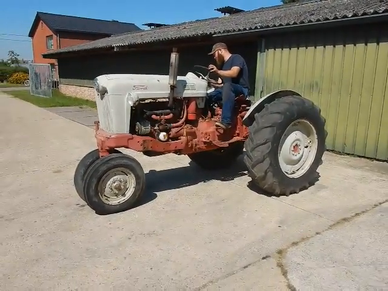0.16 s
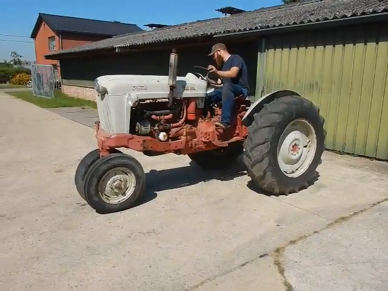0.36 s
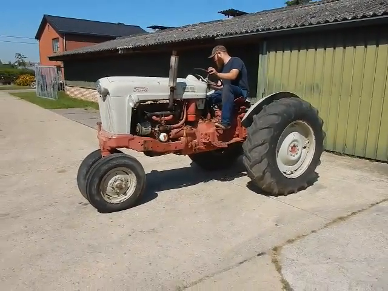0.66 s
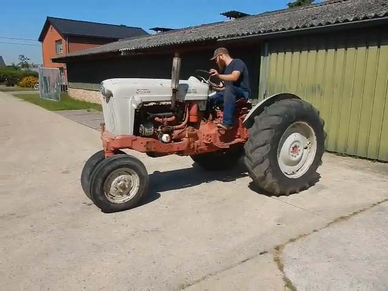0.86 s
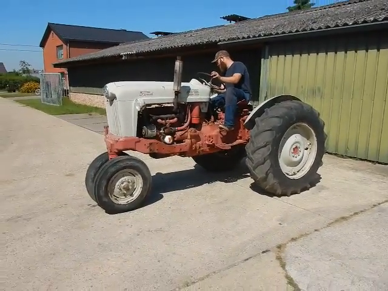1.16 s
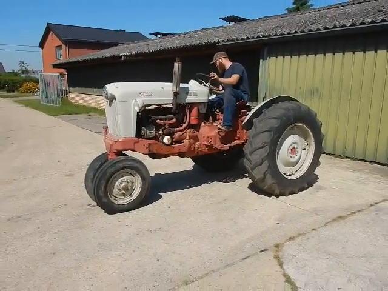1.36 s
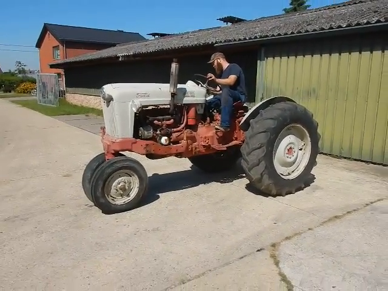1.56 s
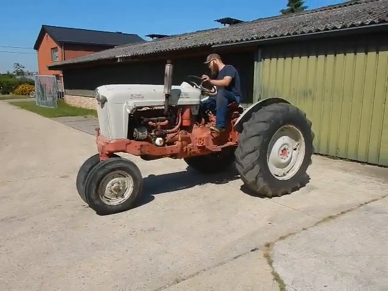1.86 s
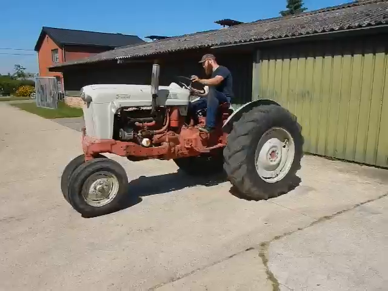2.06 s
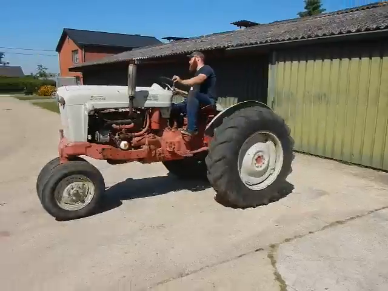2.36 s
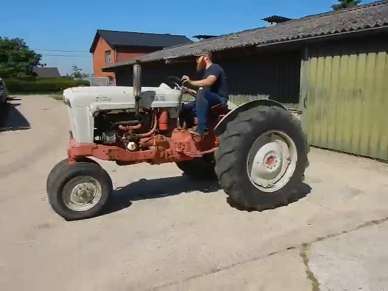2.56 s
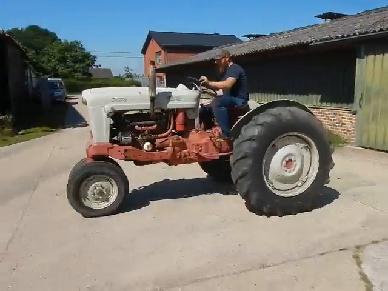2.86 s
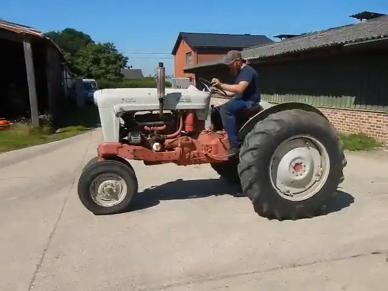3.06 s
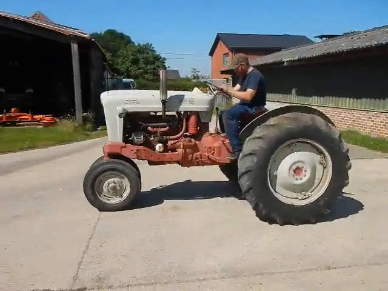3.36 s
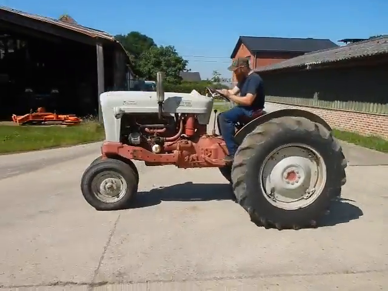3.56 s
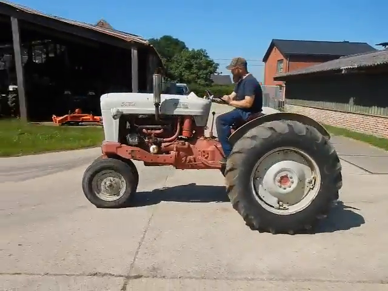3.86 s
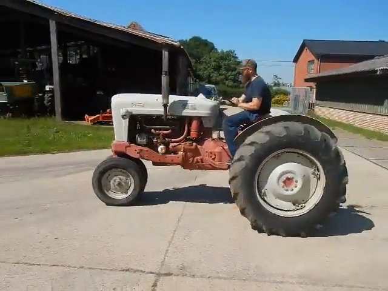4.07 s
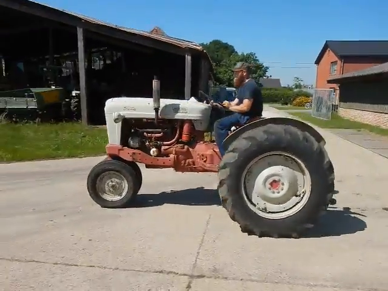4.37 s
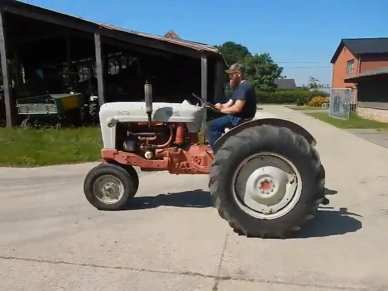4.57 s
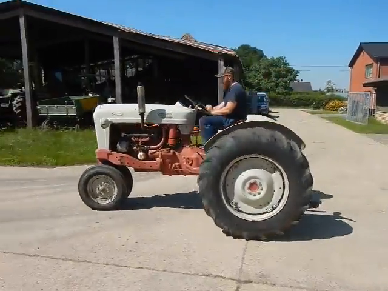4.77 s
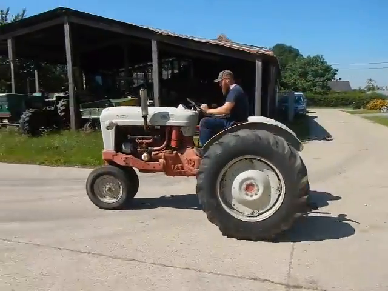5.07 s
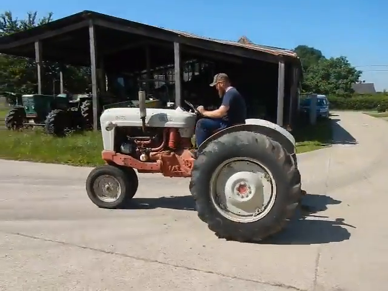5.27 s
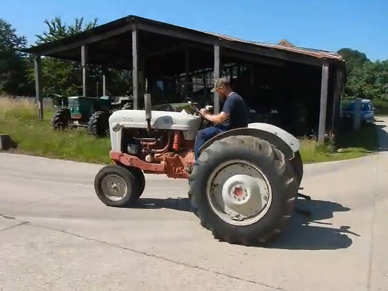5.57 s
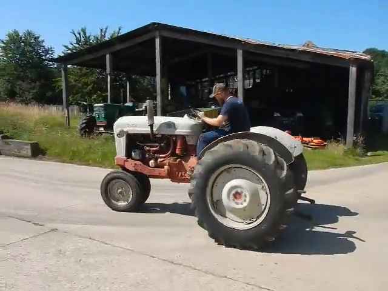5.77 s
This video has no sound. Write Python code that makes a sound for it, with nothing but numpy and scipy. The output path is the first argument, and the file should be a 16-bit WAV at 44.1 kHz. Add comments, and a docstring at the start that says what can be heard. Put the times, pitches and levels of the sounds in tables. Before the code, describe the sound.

Uneven, clattering throb of a vintage diesel tractor close by outdoors; the exhaust sinks twice amid rapid metal knocks, then revs up with a lumpy growl.

```python
"""On an open concrete yard an old four-cylinder diesel tractor drives past, a few metres from a microphone pair.
Tuned lines, a drone and surging noise make the uneven, throbbing exhaust; shaped noise clatters in the block.
Twice the exhaust dies away and the engine knocks hard, in bursts of metal contact that leave the block ringing.
Then it pulls again, the second time faster and with a lumpy growl; near the end the level dips briefly.
A gear whines faintly, a panel buzzes once and the barn walls scatter a little of the metal sound."""
import sys
import numpy as np
from scipy import signal
from scipy.fft import rfft, irfft
from scipy.io import wavfile

SR = 44100
rng = np.random.default_rng(int(sys.argv[2]) if len(sys.argv) > 2 else 0)


def put_to_file(sound):
    """Save the sound as 16-bit audio at rate SR, in the file named by the first command-line argument."""
    columns = np.atleast_2d(sound).T  # one column per channel
    safe = np.clip(columns, -1, 1)
    whole_steps = np.round(safe * 32767)
    wavfile.write(sys.argv[1], SR, whole_steps.astype(np.int16))


N = 260631
TIME = np.arange(N) / SR
SLOW_RATE, FAST_RATE = 46, 57  # slow and fast running, firings per second
LUGGING_DB = 1  # loss of the exhaust's low thump and drone for each firing per second below slow running
UNSTEADY = 0.08  # share by which the exhaust lines and the block's hum waver in level
THROB_DEPTH = 0.3  # depth of the throb at slow running; half of it at fast running


def amp(db):
    """Decibels to gain."""
    return 10 ** (np.asarray(db) / 20)


def unit(x):
    """Scales to rms 1."""
    return x / np.sqrt(np.mean(x ** 2) + 1e-20)


def curve(rows):
    """A time table, at every sample."""
    return np.interp(TIME, *np.transpose(rows))


def read(points, hz):
    """A spectrum table on a log-frequency axis."""
    f, value = np.transpose(points)
    return np.interp(np.log(hz + 1), np.log(f), value)


def colour(x, points):
    """Filters by the shape of a spectrum table, keeping the power of white noise."""
    gain = unit(amp(read(points, np.fft.rfftfreq(N, 1 / SR))))
    return irfft(rfft(x) * gain, N)


def wander(hz):
    """Slow chance of rms 1, up to about hz."""
    f = np.fft.rfftfreq(N, 1 / SR)
    return unit(irfft(rfft(rng.standard_normal(N)) * np.exp(-(f / hz) ** 2), N))


def bursts(firings, places, levels_db, rise, fall, spread_db):
    """Envelope of one burst per cylinder and cycle, no two equally strong; rise and fall in firings."""
    out = np.zeros(N)
    for place, db in zip(places, levels_db):
        cycle, age = np.divmod(firings - place + len(places), len(places))
        sizes = amp(db + spread_db * rng.standard_normal(200))
        out += sizes[cycle.astype(int)] * (1 - np.exp(-age / rise)) * np.exp(-age / fall)
    return unit(out)


def turbulence(firings, repeating):
    """Noise of which a share comes back alike in every engine cycle, which gives it the engine's pitch."""
    pattern = rng.standard_normal(3840)
    cycle_share = firings / len(CYLINDERS) % 1
    alike = pattern[(cycle_share * len(pattern)).astype(int)]
    return np.sqrt(repeating) * alike + np.sqrt(1 - repeating) * rng.standard_normal(N)


# Engine speed. Each row: time in seconds, firings per second.
SPEED = [(0.0, 45.86), (0.46, 46.17), (1.04, 45.54), (1.75, 45.23), (1.91, 43.83), (2.11, 35.02),
         (2.21, 35.17), (2.38, 46.09), (2.47, 47.82), (3.64, 45.06), (4.03, 46.15), (4.2, 45.42),
         (4.31, 47.55), (4.4, 52.42), (4.71, 56.97), (4.97, 57.45), (5.43, 56.6), (5.91, 58.34)]


def firing_rate():
    """The crankshaft's pace, in firings per second."""
    return curve(SPEED)


def lugging_db():
    """Level lost while the engine is dragged below slow running."""
    return LUGGING_DB * np.maximum(SLOW_RATE - firing_rate(), 0)


# Balance of the tractor's front and rear sound. Each row: time in seconds, share (0 front, 1 rear).
VIEW = [(0, 0.051), (2.5, 0.4), (3.5, 0.42), (4.3, 0.8), (5.1, 0.51), (5.9, 0.73)]


def rear_view():
    """How much of the rear sound is heard, rising and falling: 0 front, 1 rear."""
    return curve(VIEW)


# The engine comes off load, the first time in two steps. Each row: start, falling, staying low and
# recovering, all in seconds, then drop of the exhaust note, of the roar and of the clatter, all in dB.
DIPS = [(2.06, 0.078, 0.38, 0.93, 5.5, 8.5, 5), (2.3, 0.044, 0.13, 0.83, 5, 6.5, 9),
        (4.21, 0.15, 0.12, 0.65, 6, 7.5, 7), (5.61, 0.056, 0.053, 0.19, 3, 3, 2.5)]


def dip_db(column, lag_s=0):
    """Level change in the dips: each falls, stays low and recovers. Column 0 exhaust note, 1 roar, 2 clatter."""
    lost_db = 0
    for start, fall, stay, recover, *drops in DIPS:
        corners = start + np.cumsum([0, fall, stay, recover])
        lost_db = lost_db + drops[column] * np.interp(TIME - lag_s, corners, [0, 1, 1, 0])
    return -lost_db


def drone_turns(firings, fast):
    """Cycles of the drone, which runs a little above twice the firing rate."""
    return np.cumsum((2.285 - .028 * fast) * np.gradient(firings))


def throb(firings, fast):
    """Gain that swells as drone and hum fall into step, 10 to 15 times a second; mostly at slow running."""
    beat = drone_turns(firings, fast) - (2 * firings - .45)
    return unit(1 + THROB_DEPTH * (1 - fast / 2) * np.cos(2 * np.pi * beat))


# The four cylinders, heard in the exhaust, the roar and the clatter. Each row: exhaust opening in firings into
# the cycle, relative puff in dB, combustion in firings, relative clatter in dB from the front and from behind.
CYLINDERS = [(0.604, 0, 0.058, 5.5, -3), (1.18, 2.5, 0.85, -4, -5.5), (2.418, 1, 1.7, -7.5, -3),
             (3.7, -1.5, 2.98, 3.5, 2)]
# Exhaust lines before the overall trim. Each row: multiple of the firing rate, level in dB slow and fast.
EXHAUST_LINES = [(1.0, -27, -25), (1.25, -44, -41), (1.5, -28, -37), (1.75, -37, -36), (2.5, -39, -41),
                 (3.0, -34, -31.5), (3.25, -45, -50), (3.75, -38, -36), (4.0, -26.3, -27.5),
                 (4.25, -36, -40), (4.5, -37, -37), (4.75, -33, -36), (5.0, -26.5, -37), (5.25, -39, -35),
                 (5.5, -36, -42), (5.75, -47, -38), (6.0, -30, -39), (6.25, -32, -43), (6.5, -44, -41),
                 (6.75, -36, -38), (7.0, -39, -41), (7.25, -44, -50), (7.5, -43, -50), (7.75, -42, -48),
                 (8.5, -49, -41), (9.0, -46, -34), (9.88, -38, -50), (10.75, -45, -42), (11.0, -52, -42),
                 (11.25, -45, -41), (12.0, -52, -43)]
# The upper lines as the load comes and goes. Each row: time in seconds, level change in dB.
UPPER_DB = [(1.7, 0), (1.92, 0), (2.06, -1), (2.16, -9.5), (2.36, -16), (2.6, -10.5), (3.1, -6.5),
            (3.4, -1), (3.8, 1), (4.23, 0), (4.34, -10.5), (4.55, -18), (4.72, -4), (5.0, -4), (5.6, 0.5),
            (5.72, -5), (5.91, -2.5)]
# One line sings out as the load changes. Each row: start and end in seconds, multiple of firing rate, dB.
SINGING = [(1.943, 2.456, 3, 13.5), (2.68, 3.37, 4, 5), (3.853, 4.38, 3, 6.5), (4.546, 5.0, 3, 7.5)]


def exhaust_note(firings, fast, sink=0.26, broadside_db=-2, level_db=-0.23, fast_gain_db=1.5):
    """Lines of the firing rate: four unequal puffs a cycle and the pipe's resonance set their timing."""
    pipe_hz, pipe_width_hz = 199, 30
    places, puff_db = np.transpose(CYLINDERS)[:2]
    rate = firing_rate()
    crank = firings + .004 * wander(hz=12)  # slightly uneven turning
    thump_db = (1 + sink) * dip_db(column=0) - lugging_db()
    upper_db = curve(UPPER_DB) + 20 * np.log10(throb(firings, fast))
    out = np.zeros(N)
    for multiple, slow_db, fast_db in EXHAUST_LINES:
        db = slow_db + fast * (fast_db - slow_db) + (thump_db if multiple < 3 else upper_db)
        for start, end, line, swell_db in SINGING:
            if multiple == round(line):
                progress = np.clip((TIME - start) / (end - start), 0, 1)
                db += swell_db * np.sqrt(np.maximum(np.sin(np.pi * progress), 0))
        if multiple == 1:  # the thump is softer from the side
            db += broadside_db * np.sin(np.pi * rear_view())
        puffs = np.sum(amp(puff_db) * np.exp(-2j * np.pi * multiple * places))
        pipe_lag = np.arctan((multiple * rate - pipe_hz) / pipe_width_hz)
        phase = 2 * np.pi * multiple * crank + np.angle(puffs) - pipe_lag
        out += amp(db) * (1 + UNSTEADY * wander(hz=9.7)) * np.cos(phase)
    return np.sqrt(2) * out * amp(level_db + fast * fast_gain_db)


def drone(firings, fast, slow_db=-21.5, fast_db=-22.0, follow=1.8):
    """A tone a little above the block's hum, strong under load; the two beat 10 to 15 times a second."""
    turns = drone_turns(firings, fast) + 0.0076 * wander(hz=3.8)
    level_db = follow * dip_db(column=0) + slow_db + fast * (fast_db - slow_db) - lugging_db()
    return amp(level_db) * np.cos(2 * np.pi * turns)


# Spectra of the outlet roar, from the front and from behind. Each row: frequency in Hz, relative dB per Hz.
ROAR_FRONT = [(150, -16.5), (300, -3), (380, -4), (480, -1.5), (620, -3), (780, -4), (1000, -3), (1250, -8),
              (1600, -6), (2200, -7.5), (3500, -17), (7000, -59)]
ROAR_REAR = [(150, -21), (300, -21.5), (380, -5.5), (460, -6), (540, 4), (640, -3), (780, -6), (1000, -9),
             (1250, -11.5), (1600, -9), (2200, -10), (3500, -20), (7000, -37.5)]
# Spectrum of the silencer's rumble. Each row: frequency in Hz, relative dB per Hz.
RUMBLE = [(25, -40), (45, -17), (70, -9), (110, -3), (145, -6), (185, 0), (240, 0), (300, -4), (420, -16),
          (800, -40)]


def roar(firings, fast, steady=3.0, roar_db=-22.0, fast_roar_db=1.3,
         rumble_db=-26.5, fast_rumble_db=-0.5, rumble_sink=1.03):
    """Turbulent gas, surging with each puff: a rumble in the silencer and a roar, hollower from behind."""
    places, puff_db = np.transpose(CYLINDERS)[:2]
    puffs = bursts(firings + 0.16, places, puff_db, rise=0.092, fall=0.93, spread_db=5.5)
    surge = unit(steady + puffs)
    gas = surge * turbulence(firings, repeating=0.3)
    rear = np.clip(rear_view(), 0, 1)
    outlet = (1 - rear) * colour(gas, ROAR_FRONT) + rear * colour(gas, ROAR_REAR)
    outlet_level_db = roar_db + fast * fast_roar_db + dip_db(column=1)
    rumble = colour(surge * rng.standard_normal(N), RUMBLE)
    rumble_level_db = rumble_db + fast * fast_rumble_db + rumble_sink * dip_db(column=1)
    return outlet * amp(outlet_level_db) + rumble * amp(rumble_level_db) * throb(firings, fast)


# The growl under heavy load. Each row: time in seconds, level in dB.
GROWL_DB = [(4.3, -63), (4.6, -40.5), (5.0, -36), (5.22, -25.5), (5.62, -27), (5.7, -31), (5.91, -33.5)]
# Spectrum of the growl. Each row: frequency in Hz, relative dB per Hz.
GROWL = [(300, -37), (440, -8.5), (520, 5), (580, -6), (635, 4), (720, -14), (1000, -35.5)]


def growl(firings, place=3.1, rise=0.059, hold=3.2, sag_db=-5, pause_db=-14):
    """Pulling hard, the outlet growls in lumps: once a cycle it surges, sags and breaks off; times in firings."""
    age = (firings - place) % len(CYLINDERS)
    lump_db = np.interp(age, np.cumsum([0, rise, hold, rise]), [pause_db, 0, sag_db, pause_db])
    gas = unit(amp(lump_db)) * turbulence(firings, repeating=0.35)
    return colour(gas, GROWL) * amp(curve(GROWL_DB))


# The hum at twice the firing rate. Each row: time in seconds, level in dB.
SHAKE_DB = [(1, -23.5), (1.5, -23.5), (2.05, -21), (2.2, -26.5), (2.55, -33.5), (3.3, -32), (3.75, -22),
            (4.27, -20), (4.42, -31), (4.7, -22.5), (5.5, -29.5)]


def shake(firings):
    """The pistons shake the block: a hum at twice the firing rate that sinks when the engine stops pulling."""
    level = amp(curve(SHAKE_DB)) * (1 + UNSTEADY * wander(hz=10))
    return np.sqrt(2) * level * np.cos(2 * np.pi * (2 * firings - .45))


# Ringing of the block, also used by the knocks. Each row: frequency in Hz, width in Hz, relative level in dB.
BLOCK = [(1450, 32, -8), (2090, 36, -5), (2290, 60, -9), (2840, 60, -11), (3150, 80, -13), (4680, 90, -6),
         (4870, 65, -4), (5220, 65, -3), (5390, 70, -4), (5630, 80, -5), (6030, 70, -8), (6300, 80, -8)]


def ring(force):
    """The modes of the engine block, each a narrow resonance driven by the force."""
    out = np.zeros(N)
    for hz, width, db in BLOCK:
        gain = amp(db) * np.sqrt(SR / 2 / width / len(BLOCK))
        out += gain * signal.lfilter(*signal.iirpeak(hz, hz / width, SR), force)
    return out


# Spectrum of the clatter. Each row: frequency in Hz, relative dB per Hz.
CLATTER = [(500, -24.5), (1400, 2), (2200, -28), (3100, -2), (3700, -4), (4200, -3), (4800, 2.5),
           (5400, 1.5), (6100, 0), (7200, -1.5), (8000, -13.5), (8600, -28.5), (9500, -52.5)]


def clatter(firings, fast, steady=2.24, ring_db=-8, thinning=0.3, level_db=-26.0, fast_db=0.5):
    """Combustion and valve gear rattle the block; off load the single blows stand out more."""
    places, front_db, rear_db = np.transpose(CYLINDERS)[2:]
    front = bursts(firings, places, front_db, rise=0.075, fall=0.35, spread_db=3.5)
    behind = bursts(firings, places, rear_db, rise=0.075, fall=0.35, spread_db=3.5)
    blows = front + np.clip(rear_view(), 0, 1) * (behind - front)
    wash = steady * amp(thinning * dip_db(column=0))
    rattle = unit((wash + blows) / (wash + 1)) * rng.standard_normal(N)
    db = level_db + fast * fast_db + dip_db(column=2, lag_s=0.02)
    return (colour(rattle, CLATTER) + amp(ring_db) * ring(rattle)) * amp(db)


def struck(modes, favoured_hz, age, late, focus_db=8, reach_hz=170, detune=.006):
    """Block modes dying away after contact, those near favoured_hz struck hardest; rms 1 over first 12 ms."""
    hz, width, db = np.transpose(modes)[:, :, None]
    gain = amp(db + focus_db * np.exp(-((hz - favoured_hz) / reach_hz) ** 2))
    hz = hz * (1 + detune * rng.uniform(-1.03, 1, hz.shape))
    decay = np.exp(-np.pi * width * late)
    tones = np.sin(2 * np.pi * (hz * age + rng.random(hz.shape)))
    sound = np.sum(gain * decay * tones, axis=0)
    return sound / np.sqrt(np.mean(sound[age < .012] ** 2))


# Basic spectrum of a knock. Each row: frequency in Hz, dB per Hz before the knock's own shading.
KNOCK = [(100, 2), (500, 1), (900, -0.5), (1400, 4), (2200, 8.5), (3100, 4), (3700, -1), (4800, 11),
         (5500, 10), (6700, 8), (7400, 3.5), (8200, -2.5), (9500, -29)]
# Metal knocks. Each row: start in seconds, swelling in seconds, level in dB, upper modes struck hardest in Hz,
# then clang, crack near 3 kHz and sharp edge, all in relative dB.
KNOCKS = [(2.0572, 0.006, -28, 5210, -6.5, -4, 1), (2.0858, 0.0041, -28.5, 4570, 4.5, 3, 4),
          (2.1095, 0.008, -20, 5400, -1.5, -7, 0), (2.1365, 0.008, -32, 5180, -7, -9, 2),
          (2.168, 0.0069, -23, 5160, -5, -8, -2), (2.2004, 0.0036, -23.5, 4840, -3.5, -4, -3),
          (2.2246, 0.0078, -20.5, 6290, -3, 0, -2), (2.2484, 0.0088, -27, 4830, -10, -2, -1),
          (2.2783, 0.005, -24.5, 4800, -6, 2, -1), (2.3012, 0.0075, -28, 5430, -3.5, 1, 3),
          (2.3253, 0.0027, -21.5, 5350, -6, -4, -1.5), (2.3507, 0.00075, -32, 4880, -7, -8, -2),
          (2.3706, 0.004, -33, 5610, -9.5, -6, -8), (2.3922, 0.0044, -38, 4780, -14, -1, -2),
          (2.4126, 0.005, -30, 5500, -11, -4, -13), (2.4351, 0.0057, -39, 4670, -6, -4, -4),
          (2.4578, 0.001, -34.5, 4700, -7, -10, -18), (2.4972, 0.0054, -38.5, 5280, 4, -4, -10),
          (2.8371, 0.002, -30.5, 5210, -10.5, -5, -18), (3.0065, 0.012, -30.0, 4740, -7, -2, -11),
          (4.2305, 0.0029, -19, 5630, -11, -12, -5.5), (4.2548, 0.002, -28, 5580, -3, 0, -13),
          (4.2735, 0.006, -25.5, 5280, -0.5, 2, 0), (4.2945, 0.0055, -24, 5330, -8.5, -4, -12),
          (4.3147, 0.0037, -21, 5140, 0.5, -2, -1.5), (4.3376, 0.001, -28.5, 4680, -8, -14, -17),
          (4.356, 0.006, -28.5, 4870, -6, 2, -3), (4.3744, 0.008, -30.5, 5250, -7, -6, -10),
          (4.3944, 0.004, -23.5, 4900, -1, 3.5, 0), (4.4153, 0.003, -27, 5530, -12, -7, -13),
          (4.4343, 0.0037, -26, 5500, -8, -7, -1), (4.4726, 0.00092, -22.5, 4760, -3.5, -2, -7),
          (4.4872, 0.012, -29, 5560, -7, -15, -10), (4.5078, 0.0065, -28, 5540, -4, -4, -13),
          (4.5464, 0.001, -27.5, 4910, -7.5, -15, -3), (4.5827, 0.0036, -26, 5280, -20, -2, -10),
          (4.6891, 0.003, -30.5, 4930, -13.5, -5, -6), (5.6318, 0.008, -21, 5180, -5, -3.5, -4)]


def knocks(fall=0.0042, tail=0.0055, tail_db=-22, contact_db=3, ring_db=1, clang_db=-1, hard_db=-24.0,
           thud_db=-3, thud_hz=230):
    """Each knock is a few milliseconds of metal contact that swells, stops and leaves the block ringing.
    Hard blows clang higher; the slower the engine turns, the heavier the thud beneath them."""
    age = np.arange(4096) / SR
    hz, rate = np.fft.rfftfreq(len(age), 1 / SR), firing_rate()
    lower = [mode for mode in BLOCK if mode[0] < 4000]
    upper = [mode for mode in BLOCK if mode[0] >= 4000]
    out = np.zeros(N + len(age))
    for start, rise, db, upper_hz, body_db, crack_db, edge_db in KNOCKS:
        swell, late = np.minimum(age / rise, 1) ** 1.3, np.maximum(age - rise, 0)
        shape = swell * (np.exp(-late / fall) + amp(tail_db) * np.exp(-late / tail))
        shape = shape / np.sqrt(np.sum(shape ** 2) / (.012 * SR))  # equal energy, as rms 1 over 12 ms
        shading = [(2300, body_db), (2700, crack_db), (3800, crack_db), (4400, 0), (6100, 0), (6600, edge_db)]
        tone = amp(read(KNOCK, hz) + read(shading, hz))
        contact = amp(contact_db) * shape * irfft(rfft(rng.standard_normal(len(age))) * tone)
        lower_hz = np.interp(db + body_db - hard_db, [-1, 1], [1450, 2090])
        ringing = amp(ring_db) * struck(upper, upper_hz, age, late)
        ringing = ringing + amp(clang_db + body_db) * struck(lower, lower_hz, age, late)
        first = round(start * SR)
        labour = np.clip((SLOW_RATE - rate[first]) / 4, 0, 1)
        thud_turns = thud_hz * rng.uniform(0.61, 1.25) * age + rng.random()
        thud = labour * amp(thud_db) * shape * np.sin(2 * np.pi * thud_turns)
        out[first:][:len(age)] += amp(db) * (contact + swell * ringing + thud)
    return out[:N]


def buzz(s=4.652, length=0.03, hz=1380, width_hz=170, level_db=-29):
    """A panel buzzes for a moment as the engine takes up the load again: noise through one resonance."""
    panel = signal.lfilter(*signal.iirpeak(hz, hz / width_hz, SR), rng.standard_normal(N))
    return amp(level_db) * unit(panel) * np.exp(-((TIME - s) / length) ** 2)


def whine(firings, fast, level_db=-40, fast_db=-10, follow=1.0, unsteady=0.44):
    """A gear whines faintly in step with the crankshaft, mostly at slow running."""
    turns = 21.43 * firings + 0.092 * wander(hz=6)  # gear cycles per firing
    db = level_db + fast * fast_db + follow * dip_db(column=0)
    return np.sqrt(2) * amp(db) * (1 + unsteady * wander(hz=4)) * np.cos(2 * np.pi * turns)


def yard(x, t60=0.61):
    """Faint scatter from the barn walls, different at each side: sparse decaying echoes for a third of a second."""
    t = np.arange(SR // 3) / SR
    chosen = rng.standard_normal((2, len(t))) * (rng.random((2, len(t))) < .04)
    taps = chosen * amp(-60 * t / t60) * (t > .012)
    return signal.fftconvolve(x[None], taps / np.linalg.norm(taps[0]), axes=1)[:, :N]


# The microphone pair in level. Each row: frequency in Hz, left minus right in dB.
PORT_DB = [(1300, -1.5), (2000, -3.5), (2900, -3.5), (4200, -1), (6100, 0.5), (7500, 5), (9000, 6)]
# The microphone pair in phase. Each row: frequency in Hz, lead of the left in radians.
PORT_PHASE = [(100, 0.083), (2200, .1), (3500, 0.46), (5200, 0.9), (7400, 1.3), (9000, 1.43)]


def scene():
    """One crankshaft drives the engine's layers; the sound reaches two close microphone ports."""
    rate = firing_rate()
    firings = np.cumsum(rate) / SR
    fast = np.clip((rate - SLOW_RATE) / (FAST_RATE - SLOW_RATE), 0, 1)
    metal = clatter(firings, fast) + knocks() + buzz() + whine(firings, fast)
    exhaust = exhaust_note(firings, fast) + drone(firings, fast)
    block = shake(firings)
    gas = roar(firings, fast) + growl(firings)
    tractor = exhaust + block + gas + metal
    hz = np.fft.rfftfreq(N, 1 / SR)
    port = amp(read(PORT_DB, hz) / 2) * np.exp(.5j * read(PORT_PHASE, hz))  # half the difference each way
    direct = irfft(rfft(tractor) * np.array([port, 1 / port]), N)
    return direct + amp(-25.0) * yard(metal)


# Narrow notches in the treble. Each row: centre in Hz, width in Hz.
NOTCHES = [(2500, 150), (5000, 50), (7500, 50)]


def record(dry):
    """A dip near 33 Hz and a roll-off at the top, three narrow notches in the treble, then the band limit."""
    hz = np.fft.rfftfreq(N, 1 / SR)
    response = [(20, -1.0), (33, -12.5), (43, 0.5), (8400, -1), (9600, -20.0)]  # (Hz, dB)
    dry = irfft(rfft(dry) * amp(read(response, hz)), N)
    for centre, width in NOTCHES:
        dry = signal.lfilter(*signal.iirnotch(centre, centre / width, SR), dry)
    band = signal.firwin(511, 9650, window=("kaiser", 9), fs=SR)  # upper edge in Hz
    return signal.oaconvolve(dry, band[None], "same")


dry = scene()
out = record(dry)
put_to_file(out)
```